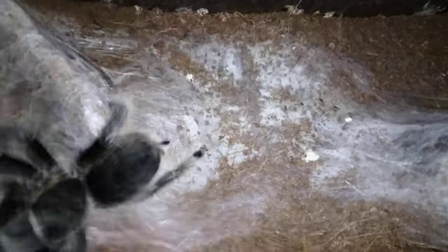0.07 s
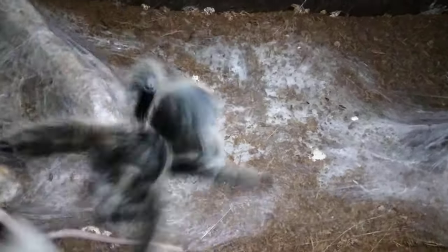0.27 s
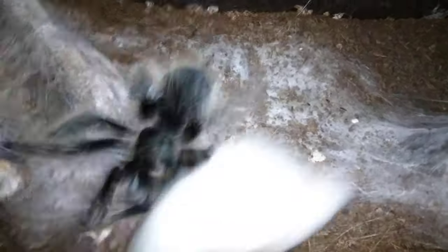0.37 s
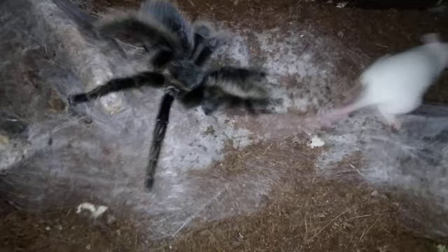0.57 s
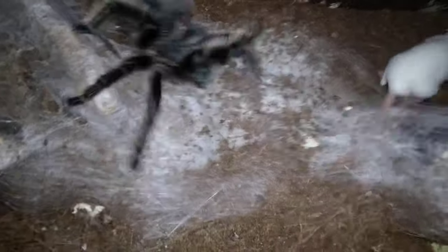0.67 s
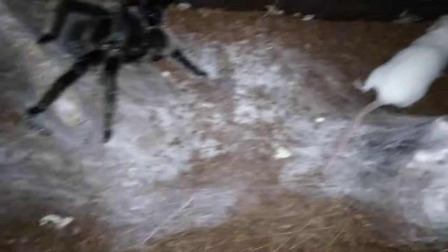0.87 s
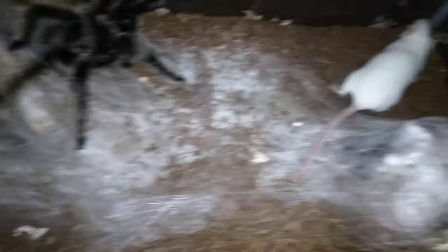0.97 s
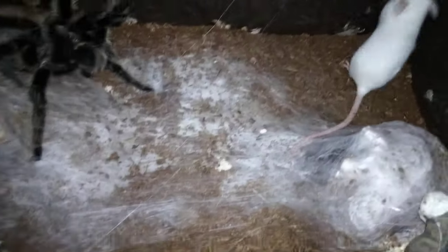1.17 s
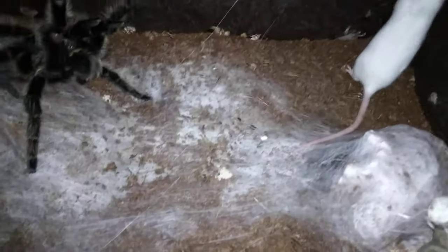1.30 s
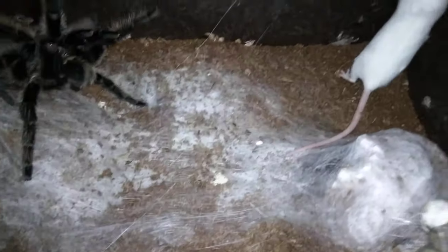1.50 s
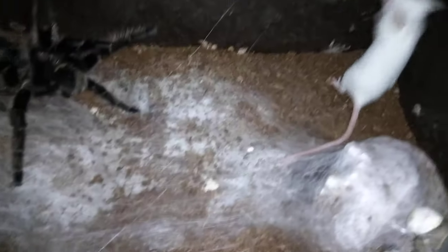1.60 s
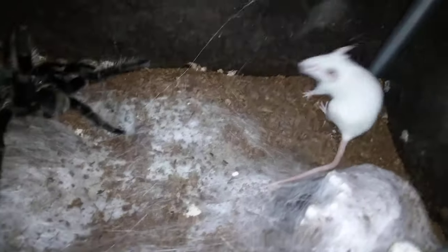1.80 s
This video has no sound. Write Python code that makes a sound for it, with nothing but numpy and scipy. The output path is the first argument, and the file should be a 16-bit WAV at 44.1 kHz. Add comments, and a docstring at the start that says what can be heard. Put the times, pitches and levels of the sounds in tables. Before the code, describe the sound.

Small animals scuffle over dry soil and webbing, with close rustles, ticks and pats over low microphone buffeting. One heavy bump makes the enclosure boom, then the movement dies down to a faint slide and low room rumble.

```python
"""A tarantula and a mouse scuffle

Close by in a small enclosure, legs rustle over dry soil and web, dry bits snap and feet pat,
mostly on the left. Bodies bump the wall and make it ring; one heavy bump sets the enclosure
booming. Low buffeting shakes the microphone. After a last soft slide, a low room rumble is left."""
import sys
import numpy as np
from scipy import signal
from scipy.fft import rfft, irfft, next_fast_len
from scipy.io import wavfile

SR = 44100
rng = np.random.default_rng(int(sys.argv[2]) if len(sys.argv) > 2 else 0)


def master(y):
    """Save y as 16-bit WAV."""
    cut = np.clip(np.atleast_2d(y).T, -1, 1)
    pcm = np.round(cut * 32767)  # scale
    wavfile.write(sys.argv[1], SR, pcm.astype(np.int16))


N = 81585
TIME = np.arange(N) / SR

# Tone tables say how dull or bright a noise is. Each row: pitch in Hz, relative strength in dB.
ROOM_TONE = [(12, -19), (22, -2), (40, -2), (66, -4.5), (100, -12), (125, -7.5), (150, -17.5), (200, -12.5),
             (250, -19.5), (320, -28), (470, -32.5), (820, -41), (1500, -59.5), (3000, -60.5), (7200, -65),
             (15800, -76)]
BUFFET_TONE = [(12, -8.5), (25, -5), (38, -9.5), (55, -2.5), (90, -1.5), (125, -19.5), (300, -45),
               (1500, -100)]
MURMUR_TONE = [(60, -28.5), (130, -16.5), (180, 7), (240, -8), (330, -12), (600, -33.5), (3000, -85.5)]
GRIT_TONE = [(30, -40), (150, -8), (450, 7), (900, -5), (1500, -6.5), (2600, -2), (5000, -12),
             (10000, -14.5), (15500, -35)]
SLIDE_TONE = [(100, -26), (400, 2.5), (1000, -3.5), (1500, -6.5), (2100, -1), (2700, 1), (3600, -7.5),
              (5000, -1.5), (6000, 2), (7300, 0), (8600, -16), (10600, -13), (12000, -22), (15800, -29.5)]
CRACK_TONE = [(100, -47), (400, -23), (1500, -5), (3500, -4.5), (7500, -6), (11000, -8.5), (15500, -26.5)]
HISS_TONE = [(100, -58), (500, -32.5), (1500, -18.5), (2200, -9), (2900, -1.5), (3700, -8), (4700, -3),
             (6000, -2), (7200, -2), (8200, -7), (9400, -9), (10600, -9.5), (12300, -21.5), (15800, -25.5)]
SCRAPE_TONE = [(120, -12), (250, 2.5), (450, 7.5), (750, 3.5), (1300, -3), (2000, -0.5), (2900, -1),
               (4000, -6), (7000, -24), (14000, -59.5)]

# How alike left and right are in the room rumble. Each row: pitch in Hz, likeness from 0 to 1.
ROOM_LIKENESS = [(30, 0), (100, .9), (200, .88), (380, 0.02), (900, .15), (3000, 0)]
# The room's hum. Each row: pitch in Hz, level in dB.
HUM_NOTES = [(121, -63.5), (199, -65.5)]
# Low buffeting on the microphone, mostly on the left. Each row: time in seconds, level in dB.
BUFFET_LEVELS = [(0, -52), (.04, -53.5), (.08, -50.5), (.14, -49.5), (.19, -43), (.225, -49), (.45, -46.5),
                 (.75, -55.5), (1.1, -61), (1.8, -65)]
# The wall murmuring under scrambling feet. Each row: time in seconds, level in dB.
MURMUR_LEVELS = [(0, -41.5), (.13, -47.5), (.2, -42), (.23, -49), (.43, -41.5), (.52, -53), (.67, -42.5),
                 (.72, -64.5), (.81, -55), (.87, -72.5), (1.1, -64.5), (1.2, -60.5), (1.35, -74.5)]
# The notes of a bumped wall. Each row: pitch in Hz, relative level in dB, seconds to fade by 60 dB.
WALL_NOTES = [(183.6, 0.5, .135), (236, -25, .15), (283, -29, 0.12), (490, -29.5, 0.085)]
# Bodies bumping the wall. Each row: start in seconds, strength in dB.
BUMPS = [(.002, -41), (.238, -9.5), (0.25, -14), (0.2546, -18.5), (.3003, -19), (0.31, -29.5), (.4185, -27)]
# Pats, mostly feet on soil; the one at 0.18 seconds is a soft, low push at the peak of the buffeting.
# Each row: start in seconds, grit level in dB, grit brightness in dB per octave,
# thud level in dB before doubling, thud pitch in Hz, grit's left minus right in dB.
PATS = [(0.0746, -34, -0.5, -34, 176, 1.5), (0.1224, -38, -0.5, -32, 265, 1.5),
        (0.18, -51, 3, -36.5, 59.3, 2), (0.398, -38, -3.5, -34.5, 308, 5), (.409, -54, 2, -36.5, 473, 5),
        (.5780, -39, -1.5, -33.5, 233, 0), (0.5896, -70, 4, -28.5, 217.6, 3),
        (.638, -40.5, -2, -50, 260, -1), (0.644, -43.5, -1.5, -41, 288, 5), (.662, -58, -14, -37, 184, 2),
        (.673, -66, -5, -43, 283, 13), (.683, -58, -11, -51, 200, -2), (0.7413, -44.5, -1.5, -41.5, 400, 6),
        (.808, -78, -2, -47, 140, 3), (1.179, -73, -2, -48, 246, -6), (1.713, -76.5, -2, -63, 245, 11)]
# Dry bits snapping. Each row: start in seconds, level in dB, pitch in Hz, fade time in seconds,
# crack compared with ring in dB, extra left minus right in dB.
SNAPS = [(.059, -43.5, 5470, 0.0033, -8, -3), (0.149, -40, 7340, 0.0034, -9, -2),
         (0.1563, -39, 7270, 0.0038, -4.5, 6), (0.157, -42, 2970, 0.0078, -9, 8),
         (0.161, -34, 6970, 0.0023, -17, 5), (0.1863, -27, 4380, 0.0025, -9.5, -0.5),
         (.188, -33.5, 3110, 0.0033, -17, 3), (.2022, -47, 7000, .001, 9, -7),
         (0.2499, -42, 4800, 0.0022, -3, -5), (.5874, -46, 6000, 0.0036, 1, -9),
         (0.6813, -31.5, 4850, 0.0039, -11.5, -9), (.686, -51, 4960, .045, -20, -5),
         (0.734, -50, 6900, .002, -3, 7), (0.744, -39, 7100, 0.0022, -8, -6),
         (0.846, -69.5, 6500, 0.0019, -8, -3), (.873, -73, 6190, .002, -11, -4),
         (1.009, -58, 5700, 0.0019, -7, 2), (1.021, -57, 6160, .001, -8, 5),
         (1.137, -50.5, 6800, 0.0029, -12, 0.5), (1.19, -76, 6000, 0.0047, 4.5, -2)]
# Legs dragging. Each row: time in seconds, hiss level in dB, scrape level in dB (both before a boost).
RUSTLE_LEVELS = [(0, -51.5, -48.5), (.048, -63, -59.5), (.060, -52, -59), (.115, -48.5, -58),
                 (.14, -58, -67), (.156, -49.5, -54), (.248, -49, -62), (.295, -57.5, -55),
                 (.385, -58.5, -58), (.402, -52, -51), (.46, -55.5, -49), (.55, -59, -62),
                 (.59, -54.5, -62), (.665, -58, -68.5), (.70, -57.5, -71), (.745, -60.5, -65),
                 (.792, -63.5, -71), (.80, -86.5, -87.5), (1.2, -91, -88), (1.45, -103, -101)]
# Where the rustle leans. Each row: time in seconds, extra left minus right in dB.
RUSTLE_PAN = [(0, 4), (.08, -1.5), (.16, -3.5), (.35, 0.5), (.46, 1.5), (.6, -2.5), (.76, -3.5),
              (1.1, -2.5)]
# How much the right side is shaded. Each row: pitch in Hz, left minus right in dB.
SHADE = [(150, 2), (280, 5), (450, 12.5), (1800, 8.5), (3500, 9.5), (5200, 12), (6500, 21.5), (8200, 15),
         (9500, 0.5), (14000, 0)]


def gain(db):
    """Turns decibels into a number to multiply by."""
    return 10 ** (np.asarray(db) / 20)


def normalize(x):
    """Scales a signal to an average strength (rms) of one."""
    return x / np.sqrt(np.mean(x ** 2) + 1e-30)


def over_time(rows, column=1):
    """Reads one column of a time table at every sample."""
    rows = np.array(rows)
    return np.interp(TIME, rows[:, 0], rows[:, column])


def at_pitch(rows, hz):
    """Reads a pitch table, blending between rows on a log scale."""
    pitches, values = np.transpose(rows)
    return np.interp(np.log(hz + 1), np.log(pitches + 1), values)


def colour(x, tone):
    """Gives a sound a tone, at an average strength of one."""
    size = x.shape[-1]
    gains = gain(at_pitch(tone, np.fft.rfftfreq(size, 1 / SR)))
    return normalize(irfft(rfft(x) * gains, size))


def pan(db):
    """Left and right gains that average one; positive dB leans left."""
    sides = gain(np.outer([.5, -.5], db))
    return sides / sides.mean(0)


def stereo(x, likeness):
    """Makes two unrelated channels partly alike."""
    return np.array([x[0], likeness * x[0] + np.sqrt(1 - likeness ** 2) * x[1]])


def noise(likeness, size=N):
    """Even noise for the left and right sides."""
    return stereo(rng.standard_normal((2, size)), likeness)


def drift(rate_hz):
    """A random wander, mostly slower than the given rate."""
    keep_slow = np.exp(-(np.fft.rfftfreq(N, 1 / SR) / rate_hz) ** 2)
    return normalize(irfft(rfft(rng.standard_normal(N)) * keep_slow, N))


def add(mix, start_s, sound):
    """Mixes a sound in at its start time."""
    part = mix[:, round(start_s * SR):][:, :sound.shape[-1]]
    part += sound[..., :part.shape[1]]


def room():
    """The room rumbles low, with a faint wavering hum."""
    likeness = at_pitch(ROOM_LIKENESS, np.fft.rfftfreq(N, 1 / SR))
    rumble = colour(irfft(stereo(rfft(noise(likeness=0)), likeness), N), ROOM_TONE)
    hum = 0
    for hz, db in HUM_NOTES:
        level = gain(db + 0.5 * drift(rate_hz=6))
        waver = 0.601 * drift(rate_hz=6)
        hum += level * np.sin(2 * np.pi * hz * TIME + waver)
    return gain(-52) * rumble + np.sqrt(2) * hum


def buffeting():
    """Handling or wind buffets the microphone: a low rumble that swells and settles."""
    return colour(noise(likeness=.7), BUFFET_TONE) * gain(over_time(BUFFET_LEVELS)) * pan(db=4)


def boom(start_s=.238, hz=63, db=-24.5, rise_s=0.0062, fade_60db_s=2.17):
    """The heaviest bump wakes the enclosure's deepest note, which rings on."""
    out = np.zeros((2, N))
    shape = gain(db - 60 * TIME / fade_60db_s) * (1 - np.exp(-TIME / rise_s))
    add(out, start_s, shape * np.sin(2 * np.pi * hz * TIME))
    return out


def wall(rise_s=0.0036):
    """The wall rings when bodies bump it and murmurs under scrambling feet."""
    ring = -sum(gain(db - 60 * TIME / fade_s) * np.sin(2 * np.pi * hz * TIME)
                for hz, db, fade_s in WALL_NOTES)
    ring *= 1 - np.exp(-TIME / rise_s)
    bumps = np.zeros((2, N))
    for start_s, db in BUMPS:
        add(bumps, start_s, gain(db) * ring)
    murmur = colour(noise(likeness=0.92), MURMUR_TONE) * gain(over_time(MURMUR_LEVELS))
    return (bumps + murmur) * pan(db=4)


def crumble(tone, fade_s, likeness, size=4096, rise_s=0.00015):
    """A tiny crumbling sound: noise that starts sharply and dies fast."""
    t = TIME[:size]
    shape = (1 - np.exp(-t / rise_s)) * np.exp(-t / fade_s)
    burst = colour(noise(likeness, size), tone) * shape
    # The shape alone sets the energy, whatever the noise happens to be.
    return burst / np.linalg.norm(burst, axis=1, keepdims=True) * np.linalg.norm(shape)


def pats(thud_rise_s=.002, thud_fade_cycles=1.32):
    """Gritty ticks with dull thuds: feet on soil, plus one soft, low push in the buffeting."""
    out, t = np.zeros((2, N)), TIME[:SR // 8]
    for start_s, grit_db, brightness, thud_db, thud_hz, side_db in PATS:
        tone = [(hz, db + brightness * np.log2(hz)) for hz, db in GRIT_TONE]
        grit = crumble(tone, fade_s=0.0025, likeness=0.65)
        add(out, start_s, gain(grit_db) * pan(side_db) * grit)
        shape = (1 - np.exp(-t / thud_rise_s)) * np.exp(-t * thud_hz / thud_fade_cycles)
        thud = -np.sin(2 * np.pi * thud_hz * t) * shape
        add(out, start_s, 2 * gain(thud_db) * thud)
    return out


def friction(clicks_per_s=7000, spread_db=3, smooth_share=.5, flutter_db=1.5):
    """Rubbing makes dense, uneven clicks over smooth noise, with a quick flutter in level."""
    sizes = gain(spread_db * np.minimum(rng.exponential(1, N), 5))
    hits = rng.random(N) < clicks_per_s / SR
    clicks = normalize(sizes * hits * noise(likeness=0))
    rubbing = np.sqrt(1 - smooth_share) * clicks + np.sqrt(smooth_share) * noise(likeness=0)
    return stereo(rubbing, likeness=0.082) * gain(flutter_db * drift(rate_hz=70))


def slide(start_s=0.97, stop_s=1.155, rise_s=0.029, fade_s=0.017, swell_db_per_s=35.5):
    """A body slides softly over the web, pressing a little harder until it stops."""
    elapsed = np.clip(TIME - start_s, 0, stop_s - start_s)
    fade_in = np.minimum(elapsed / rise_s, 1)
    fade_out = np.exp(-np.maximum(TIME - stop_s, 0) / fade_s)
    level = gain(-67 + swell_db_per_s * elapsed) * fade_in * fade_out
    return colour(friction(), SLIDE_TONE) * level * pan(db=-3.5)


def snaps():
    """Each dry bit snaps with a short crack and rings at one pitch."""
    out = np.zeros((2, N))
    for start_s, db, hz, fade_s, crack_db, side_db in SNAPS:
        crack = crumble(CRACK_TONE, fade_s, likeness=0.31)
        width_hz = 340 / (1 + fade_s / 0.027)  # longer snaps ring purer
        ring = signal.lfilter(*signal.iirpeak(hz, hz / width_hz, SR), crack)
        ring *= np.linalg.norm(crack[0]) / np.linalg.norm(ring, axis=1, keepdims=True)
        add(out, start_s, gain(db) * pan(side_db) * (ring + gain(crack_db) * crack))
    return out


def rustle(hiss_boost_db=1.5, scrape_boost_db=2):
    """Legs drag through web and soil: a bright hiss and a lower scrape."""
    hiss = colour(friction(), HISS_TONE) * gain(hiss_boost_db + over_time(RUSTLE_LEVELS, 1))
    scrape = colour(friction(), SCRAPE_TONE) * gain(scrape_boost_db + over_time(RUSTLE_LEVELS, 2))
    return (hiss + scrape) * pan(over_time(RUSTLE_PAN))


def shade(x):
    """The right side is shaded, so the sound leans left, more at some pitches than others."""
    size = next_fast_len(N + SR // 8)
    sides = pan(at_pitch(SHADE, np.fft.rfftfreq(size, 1 / SR)))
    return irfft(rfft(x, size) * sides, size)[:, :N]


def scene():
    """The scuffle, the enclosure, the buffeting and the room together."""
    return shade(rustle() + slide() + snaps()) + pats() + wall() + boom() + buffeting() + room()


def record(dry):
    """Cuts away the very highest treble."""
    cutoff_hz = 15850
    lowpass = signal.firwin(511, cutoff_hz, window=("kaiser", 9), fs=SR)
    return signal.oaconvolve(dry, lowpass[None], "same")


dry = scene()
out = record(dry)
master(out)
```